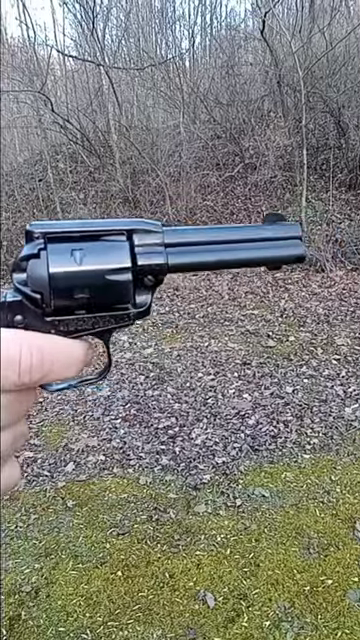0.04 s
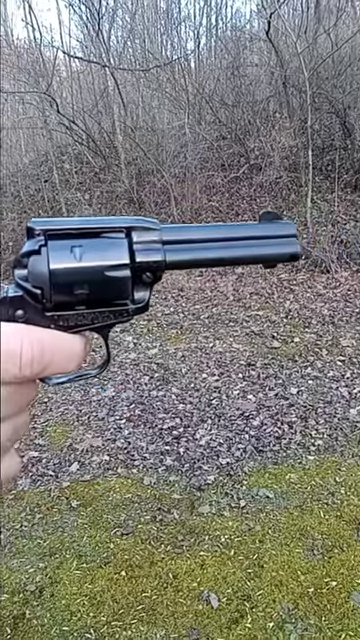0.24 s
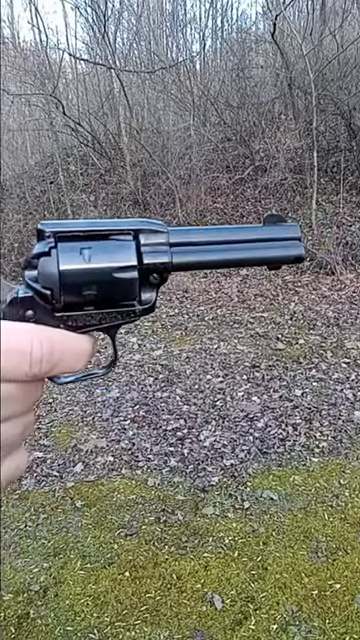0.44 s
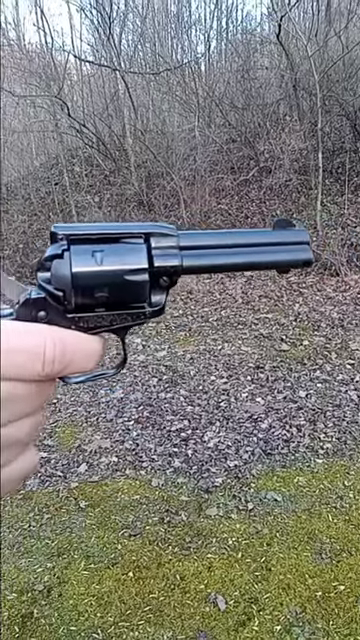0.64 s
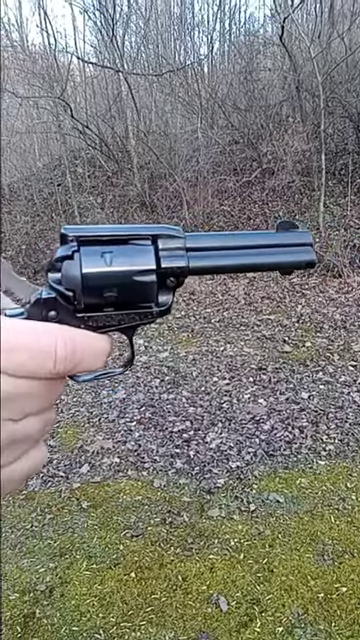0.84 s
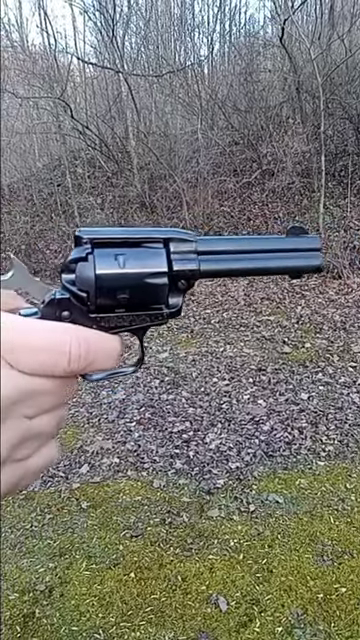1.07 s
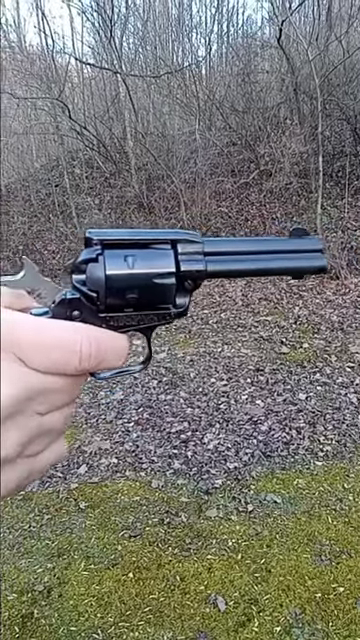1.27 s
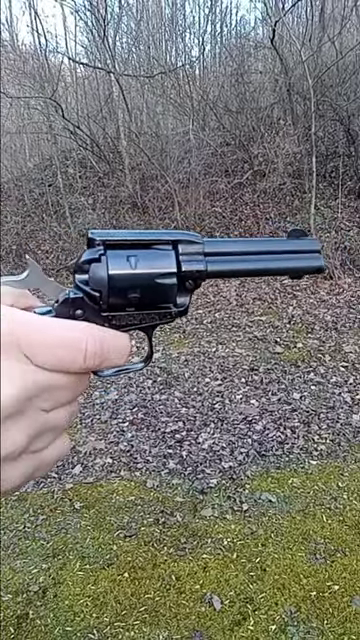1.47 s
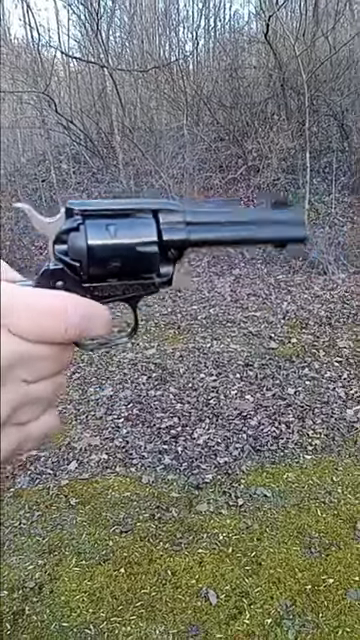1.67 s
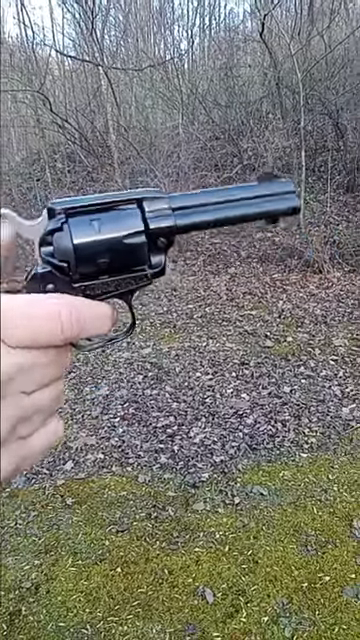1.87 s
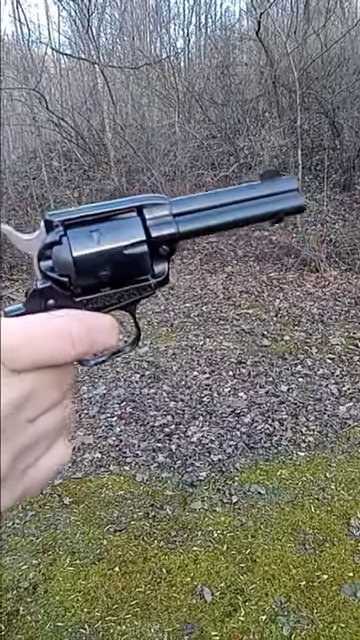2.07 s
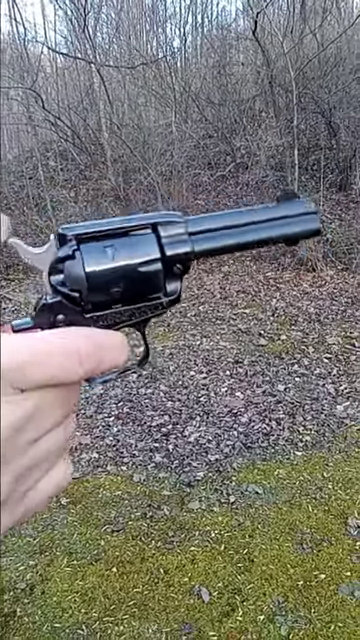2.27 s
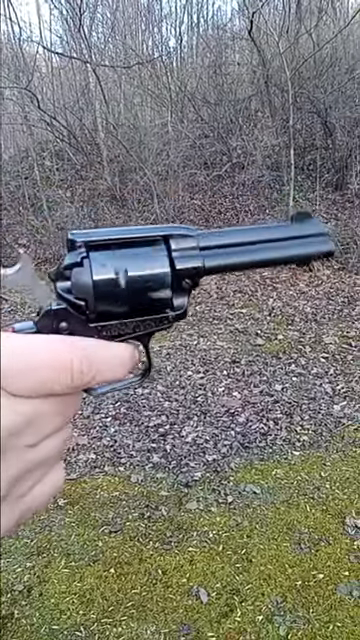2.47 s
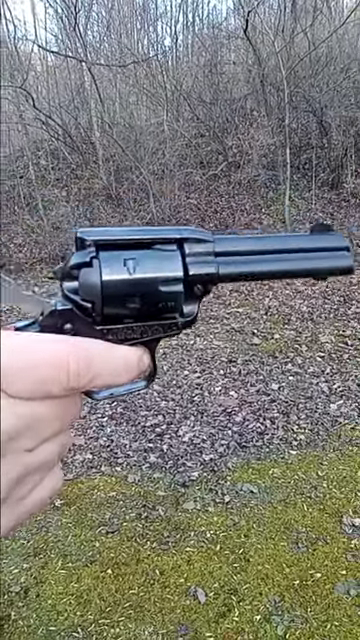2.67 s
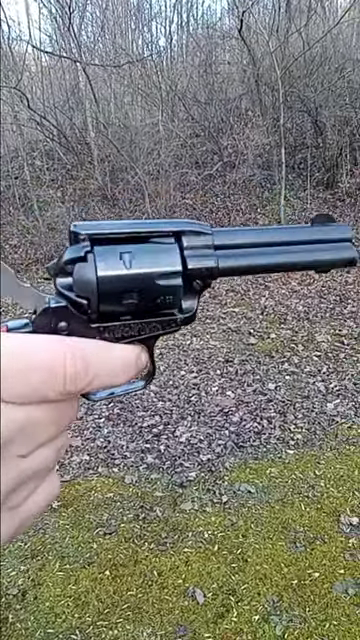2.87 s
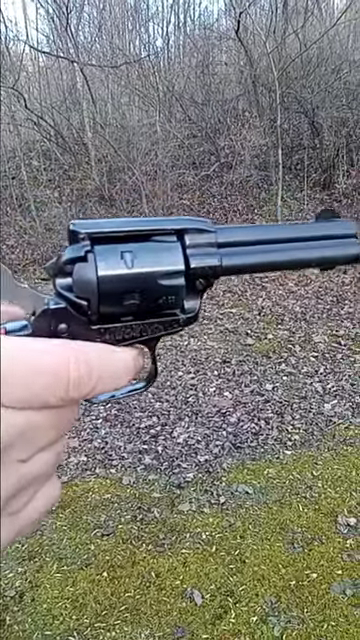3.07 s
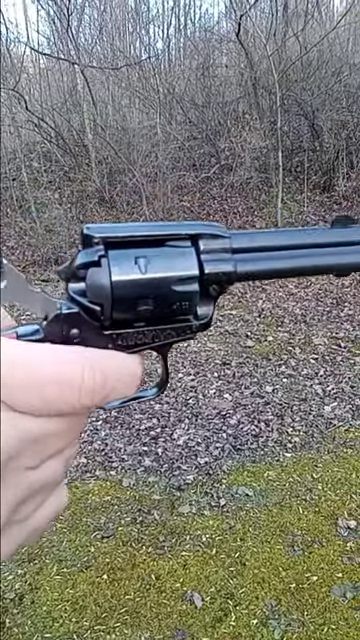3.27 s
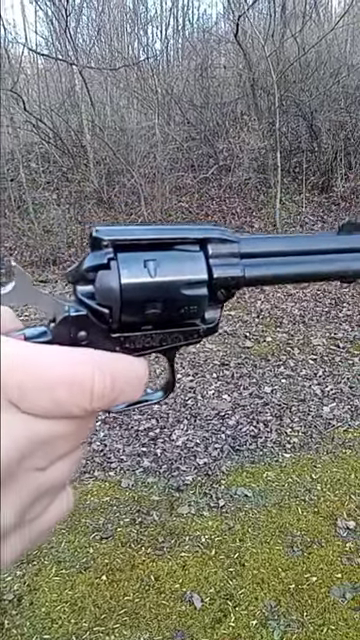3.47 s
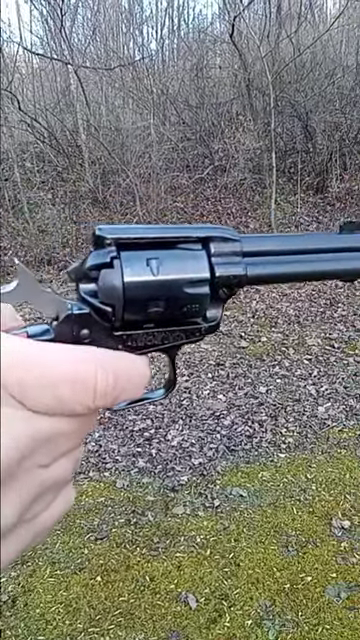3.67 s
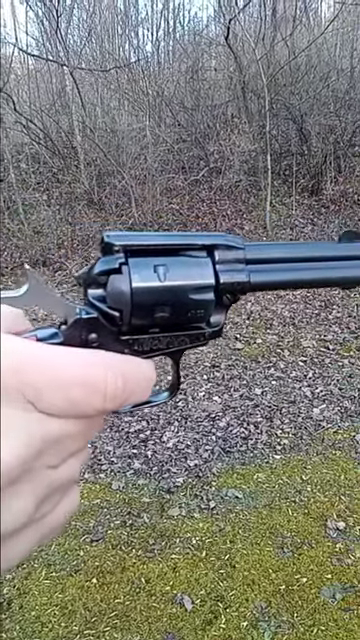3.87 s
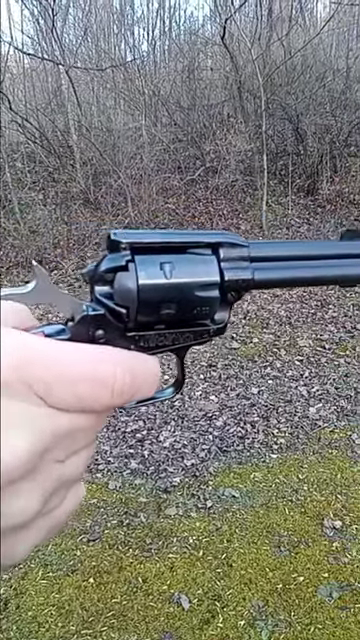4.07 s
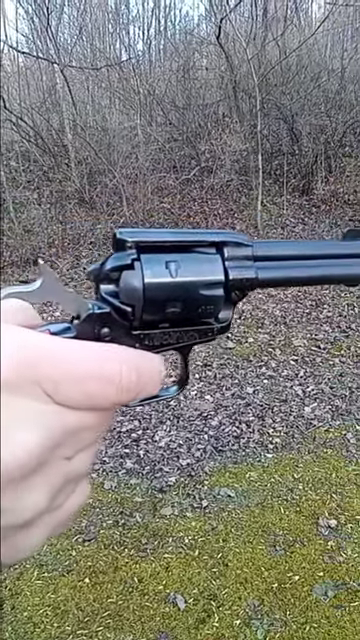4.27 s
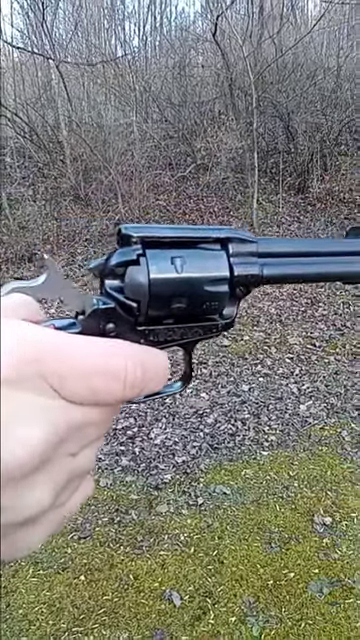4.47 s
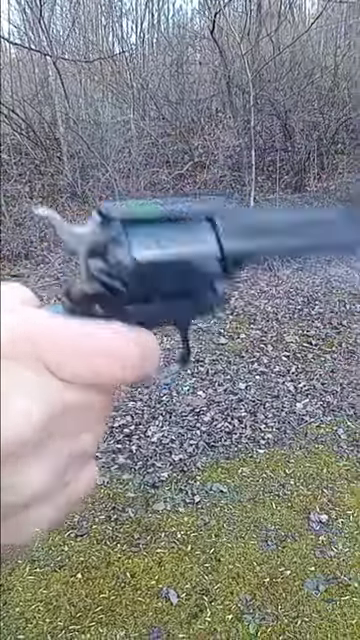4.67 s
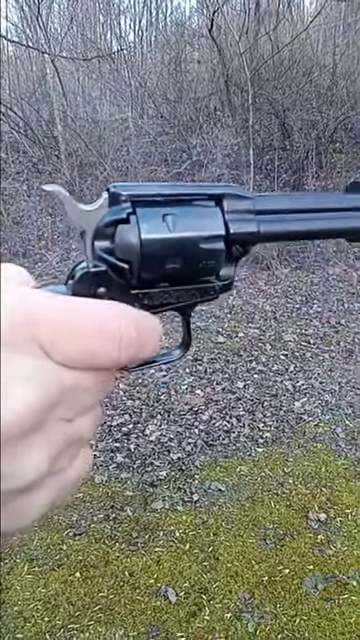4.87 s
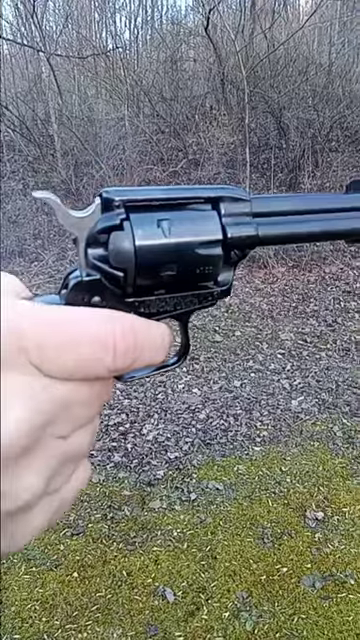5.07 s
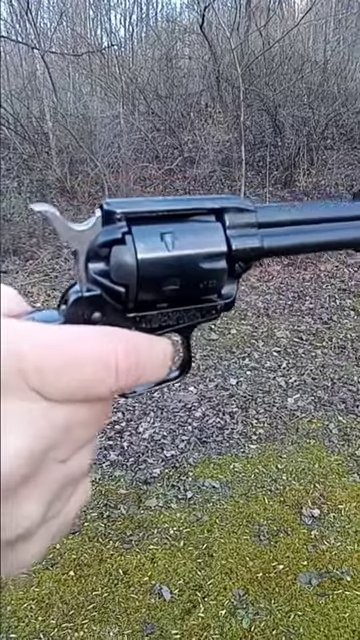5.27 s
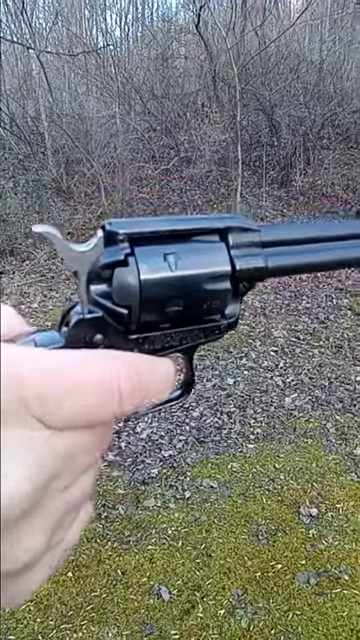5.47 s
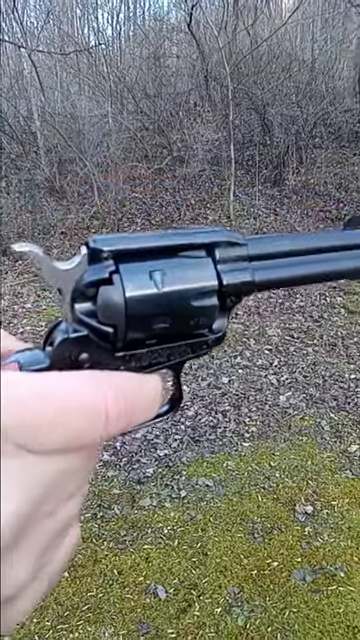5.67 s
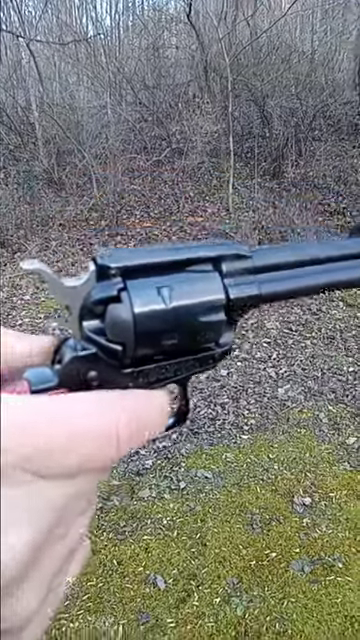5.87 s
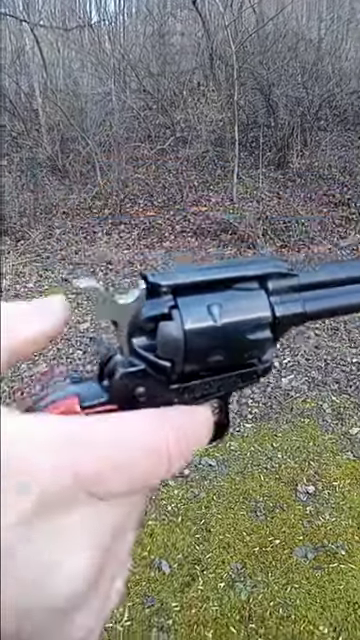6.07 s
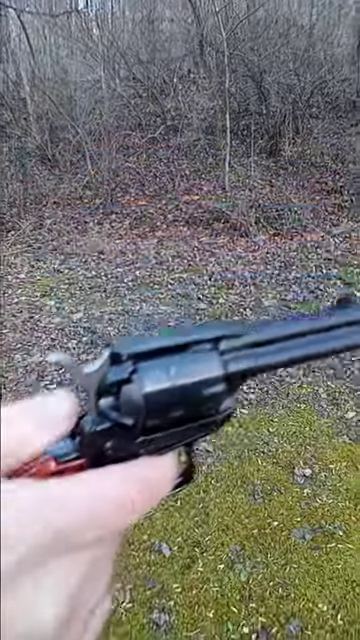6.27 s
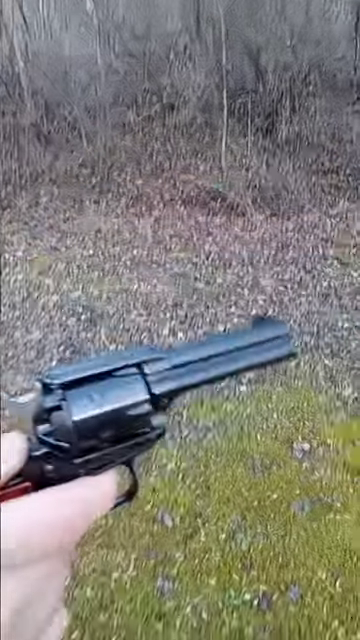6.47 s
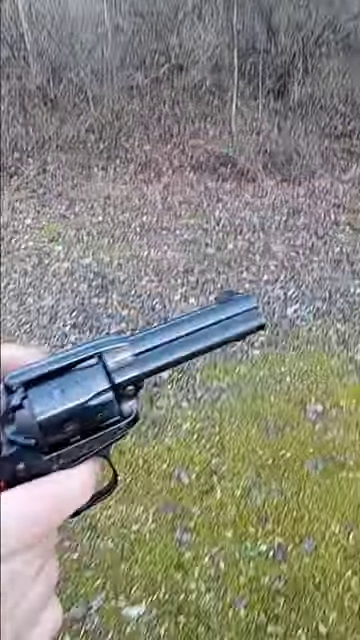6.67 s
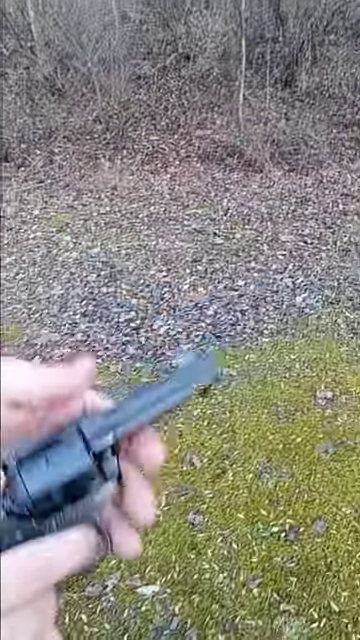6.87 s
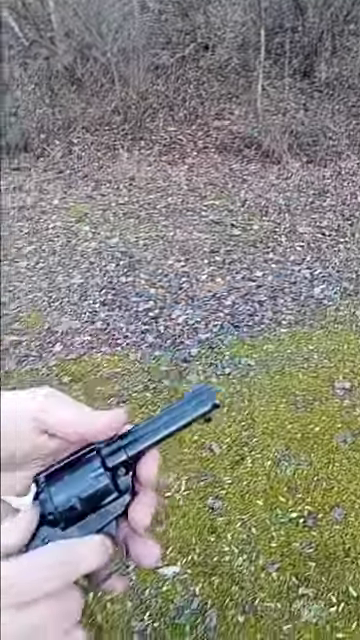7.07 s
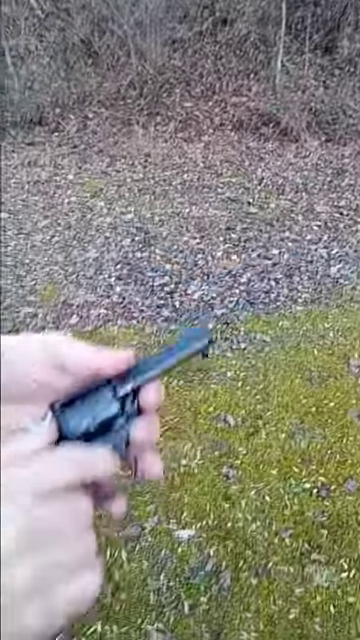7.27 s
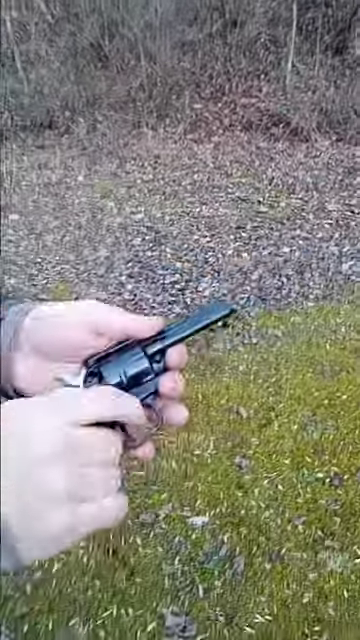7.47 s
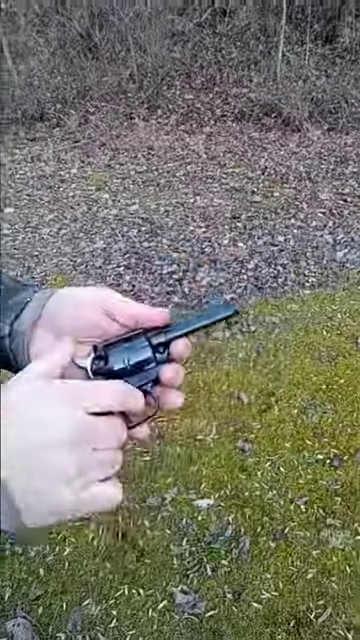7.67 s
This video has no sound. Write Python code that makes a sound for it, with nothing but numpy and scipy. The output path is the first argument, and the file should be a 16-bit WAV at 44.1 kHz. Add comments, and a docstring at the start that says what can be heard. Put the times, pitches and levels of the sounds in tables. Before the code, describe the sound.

Faint outdoor hiss and a few low wind puffs on the microphone open the scene, with the last trace of an earlier echo. At 1.5 seconds a small revolver fires very close, a sharp, slightly overloaded crack. Its echo washes back from the trees and fades over about a second, while the gun rings thinly. At 2.2 seconds the bullet pings on distant steel. From 2.4 to 2.8 seconds the hammer is cocked in a quick run of crisp metallic clicks, and a few tiny ticks follow around 4 seconds. The second shot comes at 4.7 seconds, equally loud, with the same echo and a slightly lower thin ring, then a fainter ping at 5.4 seconds. As the echo dies, fingers rub softly over the steel near 7 seconds. A sharp click at 7.4 seconds ends in a faint rattle of the loose cylinder.

```python
"""Revolver shots at a wooded bank

A small revolver fires twice beside a phone; each blast overloads the louder left microphone port.
The trees scatter the report back, the bullets ping on distant steel and the gun rings on thinly.
The hammer is cocked in sharp clicks, fingers slide over the gun and the loose cylinder rattles.
Faint outdoor hiss lies under it all, and light wind puffs on the ports."""
import sys
import numpy as np
from scipy import signal
from scipy.fft import rfft, irfft, next_fast_len
from scipy.io import wavfile
from scipy.ndimage import uniform_filter1d, map_coordinates

SR = 44100
rng = np.random.default_rng(int(sys.argv[2]) if len(sys.argv) > 2 else 0)


def pcm_store(signal):
    """Save signal as 16-bit PCM."""
    levels = np.round(np.clip(np.atleast_2d(signal), -1, 1) * 32767)
    wavfile.write(sys.argv[1], SR, levels.astype(np.int16).T)


N = 340452

# the shots: (time [s], blast [dB], pressure push [dB], hammer [dB], near echoes [dB],
# time the echo wash stays level [s])
SHOTS = [(1.5263, 2, -8, -16, -0.5, 0.42), (4.6771, 2, -2.5, -24.5, 1, .47)]
# hammer notches, pawl and cylinder stop: (time [s], level [dB], low mode [Hz], middle mode [Hz],
# high mode [Hz], body [dB], brightness [dB], left over right [dB])
CLICKS = [(2.4394, -19.5, 3050, 5430, 8080, -16, -7.5, -4.5),
          (2.5115, -19, 2520, 5330, 9240, -27, -8.5, -4.5), (2.563, -42, 2800, 4980, 9000, -30, 3, -12),
          (2.583, -18.5, 3350, 4970, 9500, -24, -5, -2), (2.606, -19, 3010, 5580, 9460, -5.5, -3, -3.5),
          (2.8073, -45, 2940, 5430, 9600, -21, -3, -8), (2.817, -26, 2726, 5330, 9600, -29, -14, 5.5),
          (3.8172, -49.5, 2530, 5400, 8460, 4, -13, 14.5), (3.981, -58, 2600, 5400, 9000, -25, 0, -6),
          (4.352, -57.5, 2600, 5400, 7540, -20, 0, 4), (6.0347, -52.5, 2600, 5170, 8580, -10, -13, 9),
          (7.3257, -44.5, 2700, 5420, 8740, 3, -16, 20.5), (7.387, -36.5, 3060, 4600, 9500, -6, -6, -1),
          (7.394, -31, 3220, 4600, 7240, -8, -11, 2), (7.4026, -18.5, 3230, 4580, 7040, -11, -5, -5)]
# tone of the muzzle blast: (frequency [Hz], left [dB], right [dB])
BLAST_COLOUR = [(30, -18.5, -20), (55, -14, -20.5), (90, -1.5, -11.5), (126, -4, -14), (209, -5.5, -6),
                (266.4, -6, -8), (334, 0, -3), (500, -9.5, -10), (880, -4, -8), (1150, -10, -10),
                (1800, -6, -11.5), (2710, 3.5, -10.5), (4000, -8.5, -17), (5800, -8, -11),
                (8000, -18, -19.5), (9000, -20, -16), (12600, -32, -29.5), (15200, -36, -23),
                (16200, -44.5, -53.5)]
# tone of a hit on steel: (frequency [Hz], left [dB], right [dB])
CLICK_COLOUR = [(1500, -23.5, -28.5), (3000, -2, -18.5), (4000, -22.5, -16), (5400, 4.5, 2),
                (7500, -8.5, -1), (9400, -18.5, 2.5), (12500, -29, -12.5), (16200, -20, -3.5),
                (16500, -43, -23)]


def shots(hammer_lead_s=.0068, hammer_t60=.035, slap_t60=0.021):
    """The hammer falls, the cartridge fires and near surfaces slap back, short of bass and top."""
    # slaps off the ground and things nearby: (delay [s], level [dB])
    slaps = [(.051, -7), (.067, -12), (.08, -8.5), (.0885, -4.5), (.102, -12)]
    out, t = np.zeros((2, N)), np.arange(SR) / SR
    for s, blast_db, push_db, hammer_db, near_db, _ in SHOTS:
        hammer = amp(hammer_db - 60 * t / hammer_t60) * attack(t, .0006) * noise(CLICK_COLOUR, len(t))
        add(out, s - hammer_lead_s, hammer)
        add(out, s, amp(blast_db) * blast(t) + crack(t) + amp(push_db) * push(t))
        for delay, slap_db in slaps:
            burst = noise(BLAST_COLOUR, len(t), shared=1.0)
            slap = unit(filtered(burst, lambda hz: hz / (hz + 500) / (1 + (hz / 6000) ** 3)))
            add(out, s + delay, amp(near_db + slap_db - 60 * t / slap_t60) * attack(t, 0.00073) * slap)
    return out


def blast(t, t60=0.065, linger_db=-16, linger_t60=0.19, left_lag_s=0.0013):
    """The muzzle blast: a burst that holds briefly, then dies away among near reflections."""
    age = np.maximum(t - stereo(left_lag_s, 0), 0)
    rise = attack(age, stereo(0.017, .0005))
    fall = decay(age, t60, hold_s=stereo(0.021, .018)) + amp(linger_db) * decay(age, linger_t60)
    return noise(BLAST_COLOUR, len(t)) * rise * fall * amp(stereo(-3, -7))


def crack(t, left_lag_s=0.0004):
    """The shock front: a bright, sudden edge that reaches the right port first."""
    # tone of the front: (frequency [Hz], left [dB], right [dB])
    front_colour = [(200, -8.5, -14), (1000, 0, -9), (2700, 4.5, -6.5), (6000, -3, -1), (9300, -13.5, -2.5),
                    (12500, -23, -9.5), (15300, -14.5, -4), (16500, -34, -24)]
    age = t - stereo(left_lag_s, 0)
    front = noise(front_colour, len(t))
    front /= front.std(axis=1, keepdims=True)
    return front * (age > 0) * decay(age, t60=0.024, hold_s=.003) * amp(stereo(-5, -12))


def push(t, delay_s=.005, width_s=0.0011, band_hz=(105, 450)):
    """The gas swings the air out and back; the ports pass only the low thump."""
    progress = np.maximum(t - delay_s, 0) / width_s
    pressure = (t > delay_s) * (1 - progress) * np.exp(-progress)
    thump = signal.sosfilt(signal.butter(2, band_hz, "band", fs=SR, output="sos"), pressure)
    return thump / np.abs(thump).max() * amp(stereo(7, 0))


def woods(grain_db=-0.5, shared=.75, earlier_shot_s=-1.55):
    """Countless small echoes off trunks and the bank, arriving in clumps; the treble dies first."""
    # tone of the echoes: (frequency [Hz], left [dB], right [dB])
    woods_colour = [(40, -32.5, -39.5), (160, -20.5, -28.5), (300, -6, -17), (520, -7, -13), (860, -2, -10),
                    (1970, -2, -18), (2450, 4, -18), (3120, -3.5, -21), (3950, -17.5, -25),
                    (5280, -18, -25), (8140, -37, -36), (9530, -49.5, -28.5), (11500, -77, -63.5),
                    (15000, -68.5, -55)]
    # echo by band: (top edge [Hz], near ground [dB], wash [dB], sag [dB/s], extra hold [s],
    # release [dB/s], far tail [dB], tail fade [dB/s])
    bands = [(650, -34, -33.5, 3, 0.082, 103, -42, 14), (2183, -21, -24, 1, 0.011, 56.5, -33, 12),
             (4300, -15, -21, 2.5, -0.042, 49.5, -33, 13.5),
             (7600, -24, -28.5, 19.5, -0.006, 123, -51, 14.5),
             (10400, -34, -38.5, 45, -.02, 169, -77.5, 11), (16000, -45.5, -53, 84, -.1, 177, -91.5, 12.5)]
    out, t = np.zeros((2, N)), np.arange(N) / SR
    echoes = rng.standard_normal((2, N)) + shared * rng.standard_normal(N)
    echoes *= amp(grain_db * wobble(900, N))
    scatter = coloured(patchy(echoes, depth_db=1.44), woods_colour)
    reports = [(s, near_db, hold) for s, *_, near_db, hold in SHOTS]
    reports.append((earlier_shot_s, 0, .5))  # the tail of an earlier shot still hangs in the air
    bottom = 1
    for top, *shape in bands:
        power = sum(echo_power(np.maximum(t - s, 0), db, hold, shape) for s, db, hold in reports)
        band = filtered(scatter, lambda hz: lowpass(hz, top, 24) * (1 - lowpass(hz, bottom, 24)))
        out += np.sqrt(power) * unit(band)
        bottom = top
    return out


def echo_power(age, near_gain_db, hold, shape, near_start_s=.02, near_rise_s=.025, wash_rise_s=0.22):
    """After the ground scatter, the echo wash swells, stays level for a moment, then fades to a tail."""
    near_db, wash_db, sag, extra_hold, release, tail_db, fade = shape
    near = amp(near_db + near_gain_db) * decay(age, t60=0.37, hold_s=.1)
    near *= ramp(age - near_start_s, near_rise_s)
    wash = amp(wash_db - sag * age - release * np.maximum(age - hold - extra_hold, 0))
    tail = amp(tail_db - fade * age)
    return near ** 2 + ramp(age, wash_rise_s) ** 2 * (wash ** 2 + tail ** 2)


def pings(splash_db=-8, splash_t60=.16):
    """Each bullet rings a far steel plate and shatters on it in a splash of noise."""
    # hits as they are heard: (time [s], level [dB], high ring and splash gain [dB])
    hits = [(2.171, -14, -21.5), (2.185, -12, -30), (5.359, -22.5, -32.5)]
    # the plate's low and high modes: (frequency [Hz], level [dB], t60 [s])
    low_modes = [(2156, 2.5, 0.078), (2300, -8.5, 0.26)]
    high_modes = [(6706, 4.5, 0.27), (6790, -1, .14), (7640, -20, .08), (9260, -25, .08)]
    out, t = np.zeros((2, N)), np.arange(SR // 2) / SR
    for s, db, ring_db in hits:
        low = ring(low_modes, t) * amp(stereo(0, -19))
        high = ring(high_modes, t) * amp(stereo(0, -6))
        splash = filtered(noise(CLICK_COLOUR, len(t)), lambda hz: lowpass(hz, 9000, 6))
        splash *= amp(splash_db) * decay(t, splash_t60)
        add(out, s, amp(db) * attack(t, 0.00045) * (low + amp(ring_db) * (high + splash)))
    return out


def clicks(body_db=9, shine_db=4, tilt_db=9, tail_db=-27, gain_db=4.0):
    """Steel parts of the lock snap home: a gritty contact, three clusters of modes and a faint tail."""
    out, t = np.zeros((2, N)), np.arange(SR // 4) / SR
    for s, db, low_hz, mid_hz, high_hz, low_db, bright_db, pan_db in CLICKS:
        grit = noise(CLICK_COLOUR, len(t))
        snap = filtered(grit, lambda hz: amp((bright_db + tilt_db) * ramp(hz - 6000, 2500)))
        snap *= decay(t, t60=0.0076, hold_s=0.0015) + amp(tail_db) * decay(t, t60=0.079)
        # the left port favours the low modes, the right port the high ones
        body = cluster(low_hz, low_db + body_db, t) * amp(stereo(0, -13))
        middle = cluster(mid_hz, 0, t, spread=0.088) * amp(stereo(0, -4))
        shine = cluster(high_hz, bright_db + shine_db, t) * amp(stereo(-12, 0))
        click = (snap + body + middle + shine) * attack(t, 0.00079)
        click /= np.abs(click).max(axis=1, keepdims=True)
        add(out, s, click * amp(db + gain_db + stereo(pan_db, -pan_db) / 2))
    return out


def gun_ring(release_t60=0.42, beat_hz=8, twin_db=-6):
    """The gun's steel rings thinly after each shot; a weaker twin mode makes it beat."""
    # the ring of each shot: (time [s], frequency [Hz], level [dB], hold [s])
    tones = [(1.53, 5981, -37, .42), (4.68, 4523, -37.5, .45)]
    out, t = np.zeros((2, N)), np.arange(SR) / SR
    for s, hz, db, hold in tones:
        pair = ring([(hz, 0, np.inf), (hz + beat_hz, twin_db, np.inf)], t)
        add(out, s, pair * amp(db) * decay(t, release_t60, hold))
    return out


def phone_body(x):
    """Loud sound sets the phone's body ringing at a few narrow resonances."""
    # body resonances: (frequency [Hz], width [Hz], left [dB], right [dB])
    resonances = [(5510, 30, -1.5, -2.5), (9130, 45, 3.5, 6.5), (9360, 15, 0.5, 6), (15100, 250, 1.5, 5.5)]
    return filtered(x, lambda f: 1 + sum(
        amp(stereo(left, right)) * 1j * f * width / (hz ** 2 - f ** 2 + 1j * f * width)
        for hz, width, left, right in resonances))


def rubs(grain_db=3.5):
    """Skin sticks and slips on the steel in short soft strokes."""
    # finger strokes: (time [s], length [s], level [dB])
    strokes = [(6.912, 0.069, -57), (6.967, 0.071, -47), (7.166, 0.028, -55), (7.596, 0.033, -52.5)]
    # tone of skin on steel: (frequency [Hz], left [dB], right [dB])
    rub_colour = [(100, -14, -27), (400, -9, -19.5), (1200, -28, -32), (2520, 12.5, -23), (4100, -23, -29),
                  (5400, 1, -20), (7500, -23, -23), (11900, -38, -28), (16000, -44, -40)]
    out = np.zeros((2, N))
    for s, length, db in strokes:
        size = round(length * SR)
        envelope = amp(db + grain_db * wobble(384, SR)[:size]) * np.hanning(size)
        add(out, s, envelope * noise(rub_colour, SR)[:, :size])
    return out


def rattle(start_s=7.5, hz=5550, width_hz=420, db=-58, t60=0.6, grain_db=4):
    """The loose cylinder chatters faintly on one resonance as it settles."""
    out, t = np.zeros((2, N)), np.arange(SR) / SR
    chatter = filtered(rng.standard_normal((2, SR)), lambda f: 1 / (1 + (2 * (f - hz) / width_hz) ** 2))
    add(out, start_s, unit(chatter) * amp(db + grain_db * wobble(80, SR)) * decay(t, t60))
    return out


def wind(breeze_db=-69.5, restless_db=4.0):
    """A restless breeze and bell-shaped puffs rumble on the ports, mostly the left."""
    # puffs of wind: (peak time [s], length [s], level [dB])
    puffs = [(0.297, 0.11, -50), (.47, 0.11, -49), (0.567, 0.057, -41.5), (0.674, 0.15, -43),
             (2.94, 0.02, -40.5), (3.199, 0.068, -52.5), (3.575, .06, -51), (3.896, 0.087, -55.5),
             (4.02, .1, -57), (4.335, 0.058, -51), (5.629, 0.038, -44), (5.75, .1, -59)]
    # tone of the rumble: (frequency [Hz], left [dB], right [dB])
    wind_colour = [(20, -22.5, -38.5), (50.7, -5.5, -21), (82.5, 2.5, -17.5), (134.4, -6, -23),
                   (211, -20, -36), (498, -57, -70), (1480, -110, -110)]
    t = np.arange(N) / SR
    swells = sum(amp(db) * np.exp(-(2 * (t - s) / length) ** 2) for s, length, db in puffs)
    breeze = amp(breeze_db + restless_db * wobble(8.9, N))
    return (breeze + swells) * coloured(rng.standard_normal(N), wind_colour)


def air(hiss_db=-52, drift_db=0.58):
    """A bed of outdoor hiss, drifting slightly in level."""
    # tone of the hiss: (frequency [Hz], left [dB], right [dB])
    air_colour = [(30, -35.5, -40.5), (80, -8.5, -11), (200, -8, -18.5), (574, -9.5, -17), (1240, -8, -17),
                  (1330, -3.5, -11), (2540, 1.5, -24.5), (2920, -3, -23.5), (3860, -24, -27.5),
                  (5500, -22.5, -28), (8200, -39, -39), (9400, -46, -32.5), (12300, -59, -48.5),
                  (15200, -49, -42)]
    return amp(hiss_db + drift_db * wobble(5, N)) * noise(air_colour, N)


def ducked(x, start_s=2.43, end_s=2.975, low_db=-2.5, treble_db=-8.5, edge_hz=3500,
           dip_db=-8, dip_s=.038, loud_db=-24, fade_s=.014):
    """The background sinks during the first cocking, the treble most, and dips at its loud clicks."""
    t = np.arange(N) / SR
    during = lambda start, end: ramp(t - start, fade_s) * ramp(end - t, fade_s)
    cocking = during(start_s, end_s)
    dips = np.max([during(s, s + dip_s + fade_s) for s, db, *_ in CLICKS if db > loud_db], axis=0)
    low = filtered(x, lambda hz: lowpass(hz, edge_hz, 8))
    sunk = low * amp(low_db * cocking) + (x - low) * amp(treble_db * cocking)
    return amp(dip_db * dips * cocking) * sunk


def amp(db):
    """Decibels to gain."""
    return 10 ** (np.asarray(db) / 20)


def unit(x):
    """Scaled to rms 1."""
    return x / np.sqrt(np.mean(x ** 2) + 1e-20)


def stereo(left, right):
    """One value for each port."""
    return np.array([[left], [right]])


def ramp(x, length):
    """Rises from 0 to 1 between x = 0 and x = length."""
    return np.clip(x / length, 0, 1)


def attack(t, rise_s):
    """An exponential rise towards 1."""
    return 1 - np.exp(-t / rise_s)


def decay(t, t60, hold_s=0):
    """Holds at 1, then falls 60 dB every t60 seconds."""
    return amp(-60 * np.maximum(t - hold_s, 0) / t60)


def wobble(rate, size):
    """A smooth random curve, rate knots a second."""
    return map_coordinates(rng.standard_normal(int(size * rate / SR) + 4), [np.arange(size) * rate / SR])


def lowpass(hz, edge_hz, order):
    """Gain that rolls off above the edge."""
    return 1 / (1 + (hz / edge_hz) ** order)


def filtered(x, response):
    """x shaped by a frequency response."""
    size = x.shape[-1]
    padded = next_fast_len(size + 8192)
    return irfft(rfft(x, padded) * response(np.fft.rfftfreq(padded, 1 / SR)), padded)[..., :size]


def coloured(x, colour):
    """x with the tone of each port, at rms 1."""
    knots, *ports = np.transpose(colour)
    return unit(filtered(x, lambda hz: amp([np.interp(np.log(hz + 1), np.log(knots), p) for p in ports])))


def noise(colour, size, shared=0.42):
    """Stereo noise of rms 1, part of it shared by the ports."""
    return coloured(rng.standard_normal((2, size)) + shared * rng.standard_normal(size), colour)


def patchy(x, depth_db):
    """x in patches some 500 Hz wide and 30 ms long, each at its own level."""
    spectra = signal.stft(x, nperseg=512)[2]
    patches = uniform_filter1d(rng.standard_normal(spectra.shape[1:]), size=6, axis=0)
    patches = uniform_filter1d(patches, size=5, axis=1)
    return signal.istft(spectra * amp(depth_db * unit(patches)), nperseg=512)[1][:, :N]


def ring(modes, t):
    """Damped modes, out of phase between the ports."""
    return sum(amp(db - 60 * t / t60) * np.sin(2 * np.pi * (hz * t + rng.random((2, 1))))
               for hz, db, t60 in modes)


def cluster(hz, db, t, t60=0.03, spread=0.053):
    """A mode with three weaker close neighbours, as small steel parts have."""
    neighbours = [(hz * (1 + spread * z), db - 2.5, t60 * 0.62) for z in rng.standard_normal(3)]
    return ring([(hz, db, t60)] + neighbours, t)


def add(track, s, sound):
    """Mixes a sound in at time s."""
    start = round(s * SR)
    track[:, start:start + sound.shape[-1]] += sound[:, :N - start]


def scene(left_lag_s=0.001003):
    """The mix at the two ports; the left one hears it a moment later."""
    outdoors = ducked(phone_body(shots() + woods()) + air())
    left, right = outdoors + pings() + clicks() + gun_ring() + rattle() + rubs() + wind()
    return np.array([filtered(left, lambda hz: np.exp(-2j * np.pi * hz * left_lag_s)), right])


def record(dry, hardness=5, top_hz=15900):
    """The phone soft-clips the peaks of the blast and keeps nothing above its band limit."""
    clipped = dry / (1 + np.abs(dry) ** hardness) ** (1 / hardness)
    return filtered(clipped, lambda hz: lowpass(hz, top_hz, 80))


dry = scene()
out = record(dry)
pcm_store(out)
```